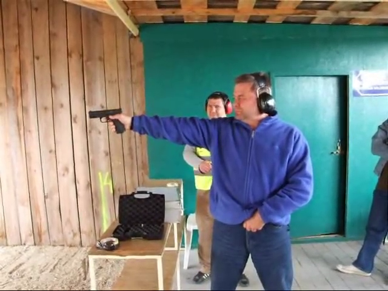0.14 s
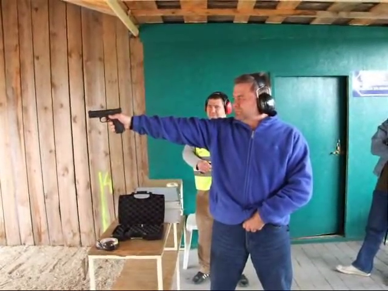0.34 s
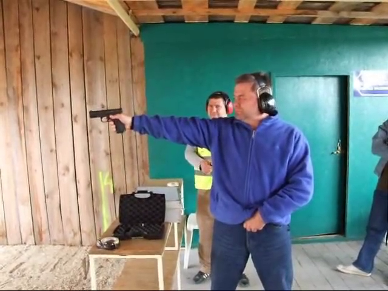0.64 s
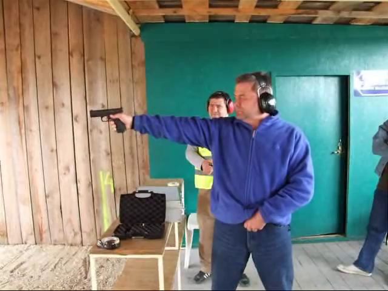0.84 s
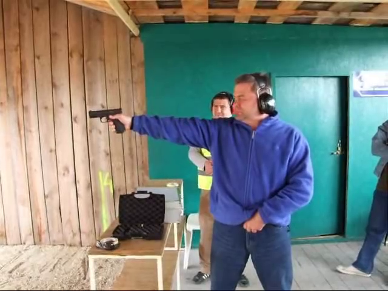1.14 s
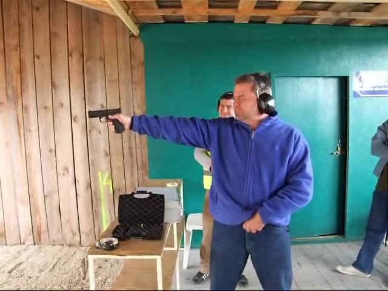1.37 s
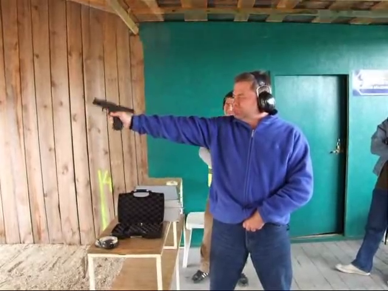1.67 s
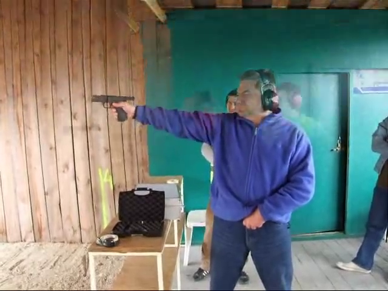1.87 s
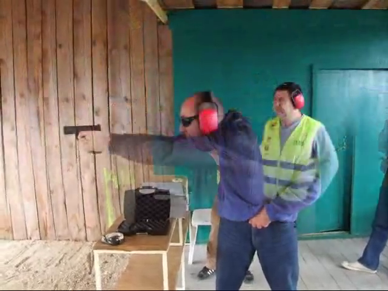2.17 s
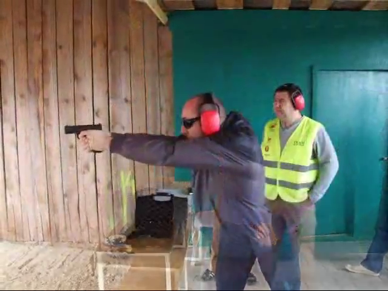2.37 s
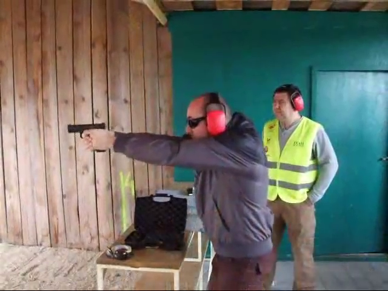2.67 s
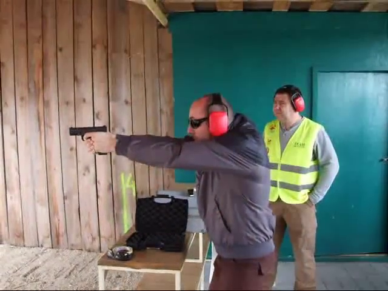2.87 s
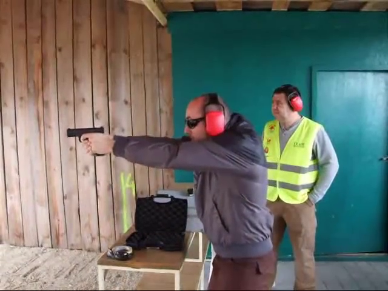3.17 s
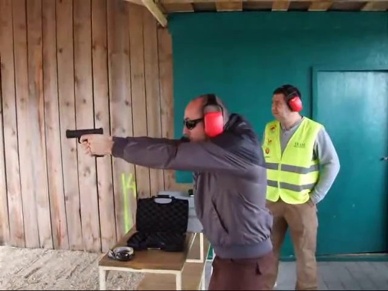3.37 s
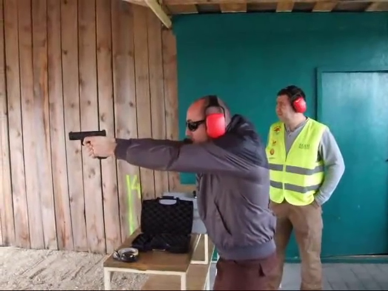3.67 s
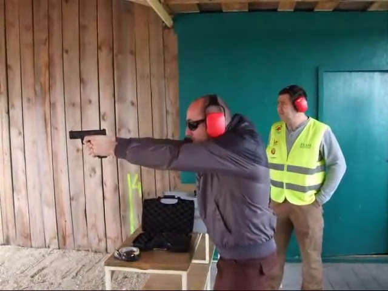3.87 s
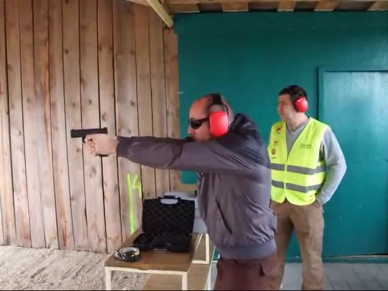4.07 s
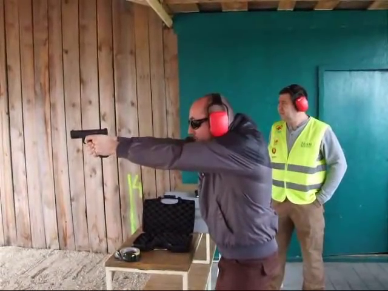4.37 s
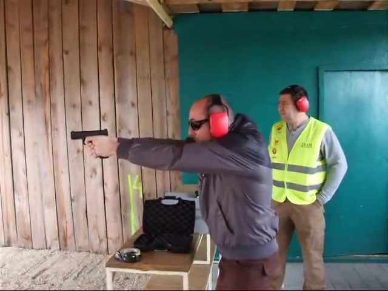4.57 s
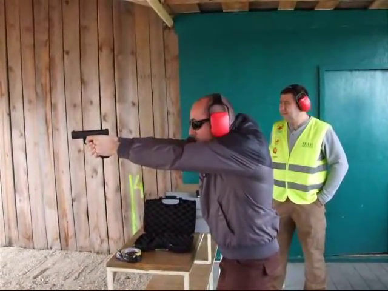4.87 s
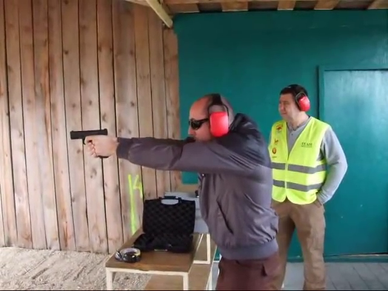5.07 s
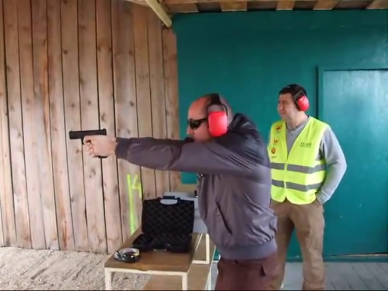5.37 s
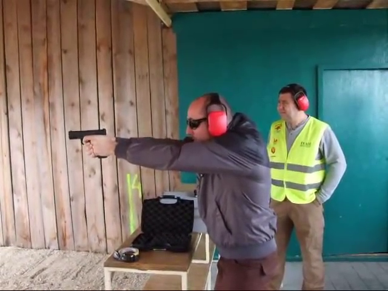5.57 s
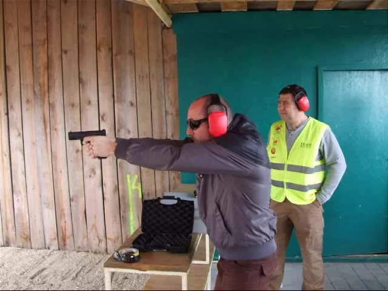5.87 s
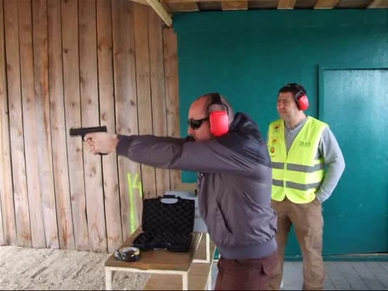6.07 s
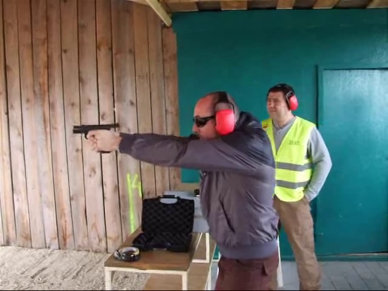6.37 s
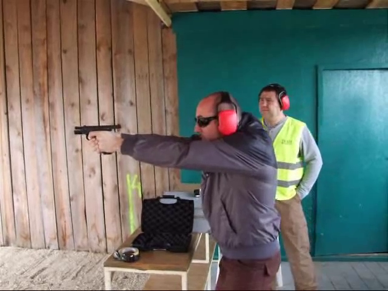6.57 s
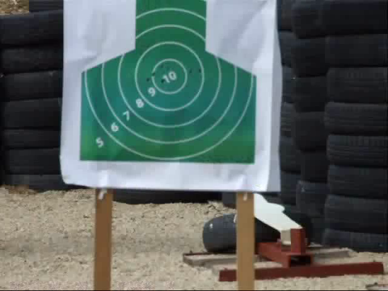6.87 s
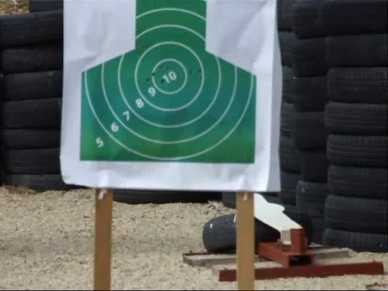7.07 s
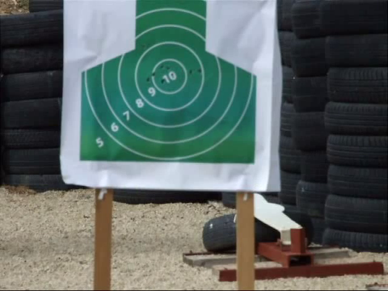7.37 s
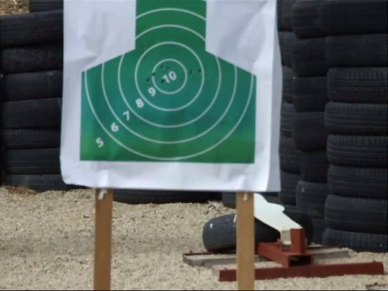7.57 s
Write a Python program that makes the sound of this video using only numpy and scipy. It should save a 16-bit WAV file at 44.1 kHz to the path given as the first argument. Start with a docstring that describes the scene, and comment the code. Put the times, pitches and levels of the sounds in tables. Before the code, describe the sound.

Six pistol shots go off at uneven intervals close to the microphone, each a sharp blast with a boom under a wooden roof and an echo lasting about a second. Wind rumbles on the microphone before the first shot and again later. A cluster of wooden knocks follows the third shot; soft ringing metal, scuffs and bouncing spent cases follow the fourth. The last two come close together over faint hiss.

```python
"""Knocks on wood and wind rumbling on a small microphone, then six close pistol shots under a shelter.
Each blast throws the membrane off centre and clips, reverberates in the wooden shelter and returns
from the berms. Between shots come snaps and scuffs, struck metal rings on in its modes, and spent
brass cases tinkle on the hard floor. A faint hiss lies under it all."""
import sys
import numpy as np
from scipy import signal
from scipy.fft import rfft, irfft, next_fast_len
from scipy.io import wavfile
from scipy.ndimage import uniform_filter1d

SR = 44100
rng = np.random.default_rng(int(sys.argv[2]) if len(sys.argv) > 2 else 0)


def inscribe(sig):
    """Save sig as 16-bit PCM at rate SR to the path in sys.argv[1].

    A 1-D sig is mono; a 2-D sig holds one channel per row.
    Samples are clipped to [-1, 1] before scaling.
    """
    pcm = np.round(np.clip(np.atleast_2d(sig).T, -1, 1) * 32767)
    wavfile.write(sys.argv[1], SR, pcm.astype(np.int16))


N = 341334

# Noise spectra, each with columns: frequency_hz, relative_density_db
HISS_SPECTRUM = [(150, -42), (250, -5), (302, -10), (399, -4.5), (885, -2.5), (949, -5), (1090, -3.5),
                 (2070, -9), (3660, -10), (8130, -12.5), (15700, -22)]  # steady background
WOOD_SPECTRUM = [(240, -43.5), (400, -15.5), (754, -14.5), (1390, -8.5), (1980, -7), (2210, -9.5),
                 (2650, -8), (2870, -9.5), (6000, -37), (7800, -66), (13200, -120)]  # dull body of a contact
CLACK_SPECTRUM = [(1530, -32.5), (2600, -5.5), (3050, -18), (3210, 1), (3680, 2.5), (6660, -1.5),
                  (9560, -3.5), (15700, -14)]  # bright edge of a knock
SIZZLE_SPECTRUM = [(6760, -37.5), (11500, -9.5), (14500, 2), (15200, -3.5), (15700, -11.5)]  # thin treble riding on the mid tones
RUMBLE_SPECTRUM = [(12, -43.5), (20, -3), (82, 2.5), (124, -4), (161, -6), (268, -21), (300, -25),
                   (390, -60), (660, -120)]  # low push of the wind
FLUTTER_SPECTRUM = [(71, -37.5), (120, -6), (199, -2.5), (450, -9), (993, -28.5), (1380, -51.5),
                    (1500, -42.5), (1950, -73.5), (3300, -120)]  # higher flutter of the wind
RUB_SPECTRUM = [(1760, -35.5), (3000, -10), (5220, -7.5), (7080, -1.5), (8900, -3), (12500, -16.5),
                (15700, -18)]  # snaps and scuffs
BOOM_SPECTRUM = [(24, -46), (40, -11.5), (96, -2), (297, -3), (337, -3.5), (433, -4.5), (800, -2.5),
                 (1040, -26.5), (1760, -120)]  # reverberation of the shelter
NEAR_ECHO_SPECTRUM = [(260, -50.5), (450, -26.5), (655, -7), (870, -3.5), (1070, -0.5), (1280, -0.5),
                      (1480, -5.5), (2430, -8), (2700, -17), (3510, -44), (5940, -120)]  # return from the near berms
FAR_ECHO_SPECTRUM = [(260, -43.5), (450, -28.5), (540, -31.5), (696, -12), (784, -10), (964, 3.5),
                     (2290, -12), (3000, -18), (3900, -56.5), (6600, -120)]  # duller return from farther off
FIZZ_SPECTRUM = [(1410, -29), (2400, -8.5), (2740, -4.5), (3850, -3), (5970, -3), (7990, -7.5), (8780, -7),
                 (10400, -7), (12400, -15), (14400, -19), (15200, -14.5), (15700, -24.5)]  # bullet crack and treble of the roar
BLAST_SPECTRUM = [(180, -18.5), (300, -8), (2460, -14.5), (4310, -20.5), (5810, -12), (7960, -8),
                  (14900, -32), (15700, -33)]  # muzzle blast
BRASS_SPECTRUM = [(1760, -50), (3000, -21.5), (4180, -17.5), (5370, -9), (5830, -5.5), (7960, -9.5),
                  (10700, -9.5), (11800, -18.5), (14600, -25), (15700, -22)]  # bright edge of a case landing

# Knocks on wood: start_s, tick_db, dull_over_bright_db, tail_db, contact_s, wood_pitch_ratio
KNOCKS = [(0.0, -19, 0.5, -5, 0.0045, 0.93), (0.154, -6.5, -7, -13, 0.0023, 0.98),
          (0.1591, -3.5, -15.5, -25, .0012, 0.8), (0.6951, -21.5, 7.5, -12.5, 0.0067, 1.01),
          (0.7536, -31, 9, -16, .0052, .92), (0.781, -34.5, 0.5, -11, .008, .76),
          (1.5931, -14, 15.5, -12, 0.008, 0.66), (1.604, -6, -4.5, -20.5, .0043, .82),
          (3.238, -2.5, 12.5, -15.5, 0.0058, 0.97), (3.4336, -1.5, 12.5, -16, .0091, .97),
          (3.5084, -8.5, 3.5, -14, .007, 1.08), (3.7266, -8.5, 5, -15, 0.019, 1.08),
          (3.8146, -2, -4, -13.5, 0.01, 0.93), (3.921, -12.5, -5, -15.5, 0.013, 0.75)]
# Hollow resonances of the wood, before a contact's pitch ratio: pitch_hz, width_hz, level_db
BOARD_MODES = [(1470, 240, -11), (2300, 280, -11)]
# Spells of wind, one curve each: time_s, rumble_db, flutter_db
WIND_SPELLS = [
    [(0.0, -37.5, -45.5), (.35, -44.5, -55), (.75, -40.5, -56), (.87, -51, -48), (.96, -28.5, -52),
     (1.24, -27.5, -45), (1.3, -34, -25), (1.5, -21.5, -30.5), (1.72, -39.5, -51)],
    [(3.3, -57, -56), (3.6, -51, -43), (3.73, -32.5, -43.5), (3.8, -42.5, -46), (4.0, -43, -44.5)],
    [(4.4, -35.5, -43.5), (4.62, -33, -45.5), (4.75, -32, -41), (4.92, -41.5, -54), (5.06, -39, -50),
     (5.17, -33.5, -48), (5.3, -31.5, -36.5), (5.47, -32.5, -38), (5.53, -48.5, -53), (6.08, -49, -55.5)],
]
# Dry snaps and longer scuffs: start_s, tick_db, dull_over_bright_db, tail_db, contact_s
SCUFFS = [(0.398, -40, 6, -6, 0.014), (2.34, -30.5, -25, -1, .02), (0.848, -34.5, 27, 3, 0.052),
          (1.3101, -10, -29, -14.5, 0.0025), (1.4355, -35, -9, -4, 0.0023), (3.615, -22, -9, -11, 0.07),
          (5.732, -27.5, -7, -6, .056), (5.801, -36.5, -4, 1, 0.35)]
# Single eddies: centre_s, level_db, flutter_over_rumble_db, half_width_s
BUFFETS = [(0.785, -22.5, -8, .012), (0.989, -28.5, -17, .025), (1.112, -35, -12, 0.01),
           (1.293, -17.5, -3, 0.013), (1.318, -10, 1, .005), (1.428, -22.5, 12, 0.017),
           (1.501, -22.5, -4, 0.021), (1.607, -17, -5.5, .012), (3.75, -30.5, 1, 0.014),
           (3.92, -30.5, -3.5, .008), (4.667, -26, -11, 0.018), (4.736, -20, -2, 0.012),
           (4.812, -27.5, -13, .014), (5.091, -29.5, -11, 0.012), (5.185, -33, 2, 0.01),
           (5.31, -29, -14, .012), (5.39, -31.5, 3, .015), (5.469, -37, -6, .012)]
# A weaker roar with no blast of its own, as a curve: time_s, boom_db, echo_db, fizz_db
FAINT_ROARS = [
    [(1.612, -24.5, -26, -32.5), (1.696, -42, -25, -27.5), (1.745, -40, -32.5, -32)],
]
# Pistol shots: start_s, blast_db, crack_db, lurch_depth, lurch_s,
# then offsets to the roar: shelter_db, return_db, late_boom_db, late_fizz_db, stretch_ratio
SHOTS = [(1.7693, -3.5, -6, 0.77, 0.025, 1.5, -4, 0.36, -.6, 0.95),
         (2.425, -10, -8, 0.69, .028, -1.5, -2.5, 0.4, .6, 0.96),
         (2.6726, -6.5, -52, 0.84, 0.036, 0.5, 0.5, -0.94, -.6, 1.028),
         (4.0466, -0.5, -7.5, 1.13, 0.026, 2, 0, -0.27, -0.51, 0.98),
         (6.1424, -4.5, -5, 0.66, 0.036, 2.5, 0, -.6, .6, .97),
         (6.3936, -5, -30.5, 1.04, 0.032, 1.5, 0, -0.091, 0.43, .95)]
# Decay curve common to all shots: delay_s, boom_db, echo_db, fizz_db
ROAR_DECAY = [(.007, -27.5, -21.5, -16), (.035, -21, -19, -18.5), (.1, -27, -27, -27.5),
              (.16, -28.5, -25, -27), (.28, -29, -20.5, -26), (.42, -34.5, -18, -28),
              (.56, -42.5, -23, -37.5), (.7, -44, -30, -46.5), (.85, -53.5, -38, -49),
              (1.05, -68, -47, -57), (1.35, -72, -49.5, -65.5)]
# Ringing of the metal: start_s, length_s, level_db, fall_db_per_s
METAL_RINGS = [(3.1, .7, -30, 11), (4.602, 1.45, -33.5, 15)]
# Cases hitting the floor: start_s, tick_db, dull_over_bright_db, tail_db, contact_s
CASE_LANDINGS = [(4.699, -21, -21, -10, 0.0023), (4.8399, 2, -20, -21, 0.00062),
                 (5.1084, -26.5, -19, -23, 0.0011), (5.2927, -24.5, -5.5, -14, .0025),
                 (5.343, -28.5, -2, -12, .0038), (5.395, -8, -30, -21, 0.0012),
                 (5.4007, -10.5, -12, -19.5, 0.0014), (5.643, -9.5, -19.5, -19, 0.0011),
                 (5.7266, -24, -0.5, -8, .0018)]
# Modes of a brass case, before its pitch ratio: pitch_hz, level_db, t60_s
CASE_MODES = [(5500, -5.5, 0.53), (7460, -4, 0.21), (11450, -7, .33)]


def gain_of(db):
    """Amplitude grows tenfold for every 20 dB."""
    return 10 ** (np.asarray(db) / 20)


def unit_rms(x):
    """Normalisation to a mean power of 1."""
    return x / np.sqrt(np.mean(x ** 2) + 1e-20)


def noise(spectrum, count, pitch_ratio=1):
    """Spectral shaping: white noise takes on a spectrum transposed by pitch_ratio, at rms 1."""
    size = next_fast_len(count + 4096)
    hz, db = np.transpose(spectrum)
    bins_hz = np.fft.rfftfreq(size, 1 / SR)
    shape_db = np.interp(np.log(bins_hz + 1), np.log(hz * pitch_ratio), db, -100, -100)
    return unit_rms(irfft(rfft(rng.standard_normal(size)) * gain_of(shape_db), size)[:count])


def lumps(lump_s, spread_db, count):
    """Log-normal amplitude modulation: a gain that wanders in lumps, at mean power 1."""
    size = max(round(lump_s * SR), 2)
    wander = uniform_filter1d(uniform_filter1d(rng.standard_normal(count), size), size)
    return unit_rms(gain_of(spread_db * unit_rms(wander)))


def resonate(x, hz, width_hz):
    """Forced response of one damped mode, at rms 1."""
    pole = np.exp((2j * hz - width_hz) * np.pi / SR)
    return unit_rms(signal.lfilter([1 - abs(pole)], [1, -pole], x).real)


def add(mix, start_s, sound):
    """Superposition: a sound sums into the mix from its start time."""
    part = mix[round(start_s * SR):][:len(sound)]
    part += sound[:len(part)]


def envelopes(rows, hold_s):
    """Linear interpolation of a curve, last row held: returns start time, edge fades and levels."""
    times, *columns = np.transpose(rows)
    t = np.arange(max(times[0] - .004, 0), times[-1] + hold_s, 1 / SR)
    fade = np.minimum(1, np.minimum(t - t[0], t[-1] - t) / .003)
    return t[0], fade, [np.interp(t, times, column) for column in columns]


def contact(spectrum, tick_db, dull_db, tail_db, contact_s, *, wood_ratio, bright_ratio,
            rise_s, t60_s, treble_t60_ratio, ring_db=-np.inf):
    """Impact excitation: a rattling tick, then an exponential tail as the shelter's walls answer."""
    n = SR // 2
    t = np.arange(n) / SR
    wood = noise(WOOD_SPECTRUM, n, wood_ratio)
    hollow = sum(gain_of(db) * resonate(wood, hz * wood_ratio, width) for hz, width, db in BOARD_MODES)
    dull = gain_of(dull_db) * (unit_rms(wood + hollow) + gain_of(-15.5) * noise(SIZZLE_SPECTRUM, n))
    bright = noise(spectrum, n, bright_ratio)
    rise = 1 - np.exp(-(t / rise_s) ** 2)
    tick = (dull + bright) * rise * np.exp(-(t / contact_s) ** 2) * lumps(.00048, 2.4, n)
    modes = sum(gain_of(db - 60 * t / mode_t60_s) * resonate(bright, hz * bright_ratio, 300)
                for hz, db, mode_t60_s in CASE_MODES)
    fall_db = -60 * t / t60_s
    tail = dull * gain_of(fall_db) + bright * gain_of(fall_db / treble_t60_ratio)
    tail += gain_of(ring_db) * modes
    tail /= np.hypot(1, gain_of(dull_db))  # dull and bright parts share the power
    build_up = rise * (1 - np.exp(-(t / .004) ** 2))
    return gain_of(tick_db) * (tick / abs(tick).max() + gain_of(tail_db) * build_up * tail)


def knock(tick_db, dull_db, tail_db, contact_s, wood_ratio):
    """Impact on wood: a longer contact rises more slowly and leaves a longer tail."""
    return contact(CLACK_SPECTRUM, tick_db, dull_db, tail_db, contact_s,
                   wood_ratio=wood_ratio, bright_ratio=1, rise_s=.00046 + .04 * contact_s,
                   t60_s=.34 + 11 * contact_s, treble_t60_ratio=.76)


def wind(rows):
    """Turbulent pressure: eddies push the membrane in lumps, with a rumble and a higher flutter."""
    start_s, fade, (rumble_db, flutter_db) = envelopes(rows, hold_s=.05)
    n = len(fade)
    eddies = lumps(.011, 2.7, n) * lumps(.035, 2.2, n)
    rumble = gain_of(rumble_db) * noise(RUMBLE_SPECTRUM, n)
    flutter = gain_of(flutter_db) * noise(FLUTTER_SPECTRUM, n)
    return start_s, fade * eddies * (rumble + flutter)


def scuff(tick_db, dull_db, tail_db, contact_s):
    """Friction noise: a brief contact snaps, a long one swells into a scuff."""
    return contact(RUB_SPECTRUM, tick_db, dull_db, tail_db, contact_s,
                   wood_ratio=.85, bright_ratio=.99, rise_s=.0001 + .6 * contact_s,
                   t60_s=.12 + 1.8 * contact_s, treble_t60_ratio=1)


def buffet(centre_s, level_db, flutter_db, half_width_s):
    """A pressure pulse: one eddy hits the microphone head-on, under a Gaussian envelope."""
    t = np.arange(-4 * half_width_s, 4 * half_width_s, 1 / SR)
    rumble = noise(RUMBLE_SPECTRUM, len(t), pitch_ratio=1.4)
    flutter = gain_of(flutter_db) * noise(FLUTTER_SPECTRUM, len(t))
    swell = np.exp(-(t / half_width_s) ** 2)
    push = unit_rms(swell * (rumble + flutter)) * np.sqrt(np.mean(swell ** 2))
    return centre_s + t[0], gain_of(level_db) * push


def roar(rows):
    """Reverberation: countless reflections merge into clumped noise; far ones come later and duller."""
    start_s, fade, (boom_db, echo_db, fizz_db) = envelopes(rows, hold_s=.022)
    n = len(fade)
    far_share = 1 - np.exp(-(np.arange(n) / SR / .73) ** 2)
    boom = gain_of(boom_db) * noise(BOOM_SPECTRUM, n) * lumps(.0122, 1.5, n)
    near = np.sqrt(1 - far_share) * noise(NEAR_ECHO_SPECTRUM, n)
    far = np.sqrt(far_share) * noise(FAR_ECHO_SPECTRUM, n)
    sizzle = gain_of(-18.5) * noise(SIZZLE_SPECTRUM, n)
    fizz = gain_of(fizz_db) * noise(FIZZ_SPECTRUM, n) * lumps(.0044, .27, n)
    echo = gain_of(echo_db) * (near + far + sizzle) * lumps(.0027, .71, n) * lumps(.045, .25, n)
    return start_s, fade * (boom + echo + fizz)


def shot(blast_s, blast_db, crack_db, lurch_depth, lurch_s):
    """Shock waves: bullet crack, then muzzle blast; the membrane lurches, shudders and overshoots."""
    n, lead = SR // 2, round(.0026 * SR)  # the crack leads the blast
    t = np.arange(n) / SR
    sound = gain_of(crack_db) * np.exp(-t / .0028) * noise(FIZZ_SPECTRUM, n)
    blast_decay = np.exp(-(t / .0028) ** 4) + .35 * np.exp(-t / .01)
    blast = gain_of(blast_db) * blast_decay * noise(BLAST_SPECTRUM, n)
    overshoot = .27 * np.exp(-(t / (4.5 * lurch_s)) ** 2)
    lurch = lurch_depth * (1 - np.exp(-t / .0017)) * (overshoot - np.exp(-(t / lurch_s) ** 2))
    shudder = noise([(30, -28), (50, 4), (80, -11.5), (200, -19)], n)
    shudder *= np.exp(-((t - .04) / .022) ** 2)
    shudder *= gain_of(-11) / abs(shudder).max()
    sound[lead:] += (blast + lurch + shudder)[:-lead]
    return blast_s - lead / SR, sound


def roar_curve(blast_s, next_s, shelter_db, return_db, late_boom_db, late_fizz_db, stretch_ratio):
    """Energy decay of one shot: the berms take over from the shelter; the next shot cuts it short."""
    takeover_s = .17
    delays, *levels = np.transpose(ROAR_DECAY)
    delays = delays * stretch_ratio
    end_s = min(delays[-1], next_s - blast_s - .022)
    t = np.append(delays[delays < end_s], end_s)
    late = np.minimum(t / takeover_s, 1)
    curves = [np.interp(t, delays, db) + (1 - late) * shelter_db + late * (return_db + extra_db)
              for db, extra_db in zip(levels, (late_boom_db, 0, late_fizz_db))]
    return np.transpose([blast_s + t, *curves])


def ringing_metal(start_s, length_s, level_db, fall_db_per_s):
    """Free vibration: struck metal sings on, with a weaker, lower partner and a wavering overtone."""
    modes_hz = 945, 770, 15052
    decay = [(start_s, level_db), (start_s + length_s, level_db - fall_db_per_s * length_s)]
    onset_s, fade, (db,) = envelopes(decay, hold_s=.085)
    n = len(fade)
    main, lower, overtone = np.sin(2 * np.pi * np.outer(modes_hz, np.arange(n) / SR))
    main *= lumps(.06, 1.6, n)
    lower *= gain_of(-10) * lumps(.04, 4, n)
    overtone *= gain_of(-21) * lumps(.01, 4, n)
    return onset_s, fade * gain_of(db) * (main + lower + overtone)


def case_landing(tick_db, dull_db, tail_db, contact_s):
    """Modal ringing: a brass case strikes the hard floor, and harder blows ring more."""
    return contact(BRASS_SPECTRUM, tick_db, dull_db, tail_db, contact_s,
                   wood_ratio=1.22, bright_ratio=.95, rise_s=.0007 + .35 * contact_s,
                   t60_s=.29, treble_t60_ratio=.83, ring_db=-8 + .36 * tick_db)


def scene():
    """Linear superposition of every source at one microphone."""
    mix = gain_of(-49) * noise(HISS_SPECTRUM, N)
    next_starts = [row[0] for row in SHOTS[1:]] + [np.inf]
    for (blast_s, *settings), next_s in zip(SHOTS, next_starts):
        direct, reflected = settings[:4], settings[4:]
        add(mix, *shot(blast_s, *direct))
        add(mix, *roar(roar_curve(blast_s, next_s, *reflected)))
    for source, table in ((ringing_metal, METAL_RINGS), (buffet, BUFFETS)):
        for row in table:
            add(mix, *source(*row))
    for source, table in ((case_landing, CASE_LANDINGS), (knock, KNOCKS), (scuff, SCUFFS)):
        for start_s, *settings in table:
            add(mix, start_s, source(*settings))
    for source, curves in ((roar, FAINT_ROARS), (wind, WIND_SPELLS)):
        for curve in curves:
            add(mix, *source(curve))
    return mix[None]


def record(dry):
    """Capacitive coupling drains steady pressure; hard clipping, an abrupt stop and a low-pass follow."""
    coupling_hz, clip_level, stop_s, band_limit_hz = 1.5, .97, 6.9695, 15860
    coupled = signal.lfilter(*signal.butter(1, coupling_hz, "high", fs=SR), dry)
    clipped = np.clip(coupled, -clip_level, clip_level)
    stopped = clipped * (np.arange(N) < stop_s * SR)
    low_pass = signal.firwin(511, band_limit_hz, window=("kaiser", 9), fs=SR)
    return signal.oaconvolve(stopped, low_pass[None], "same")


dry = scene()
out = record(dry)
inscribe(out)
```